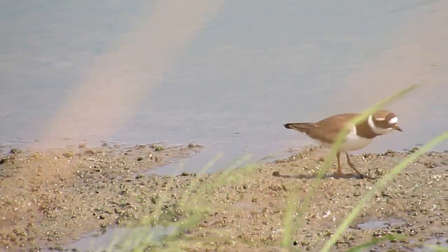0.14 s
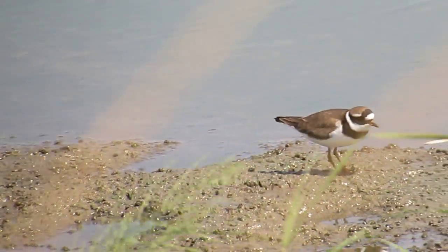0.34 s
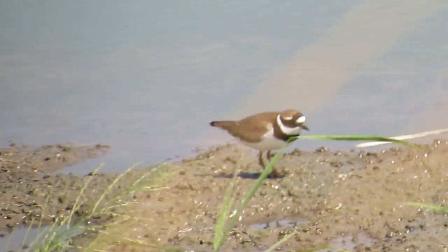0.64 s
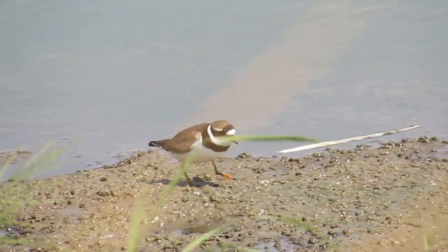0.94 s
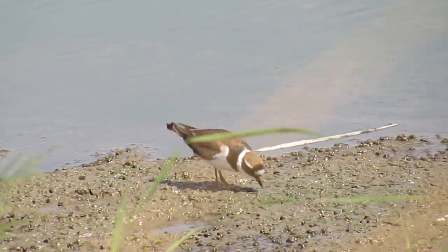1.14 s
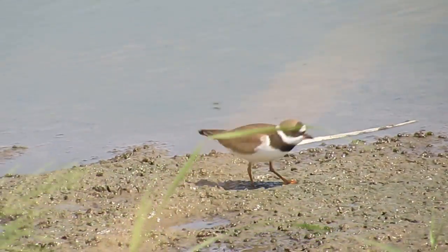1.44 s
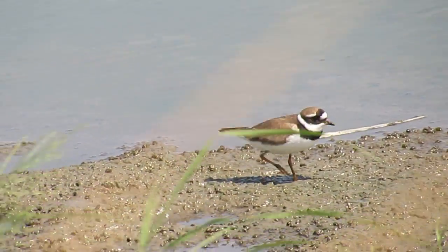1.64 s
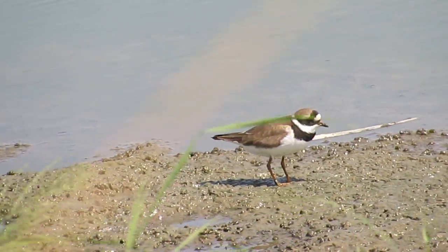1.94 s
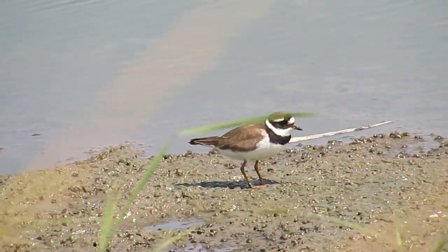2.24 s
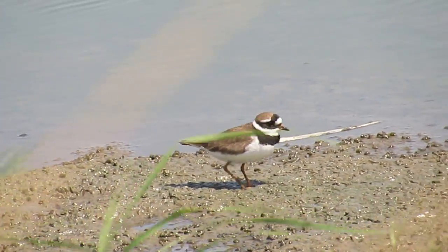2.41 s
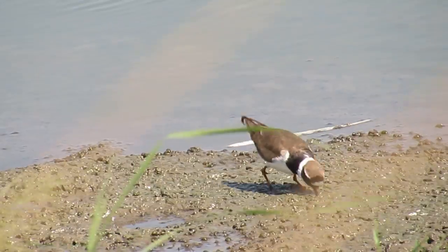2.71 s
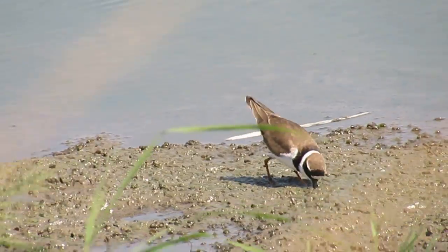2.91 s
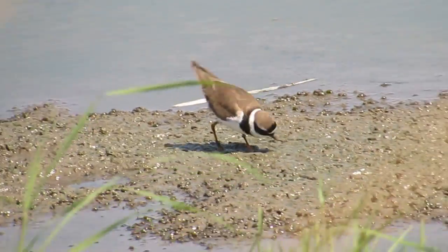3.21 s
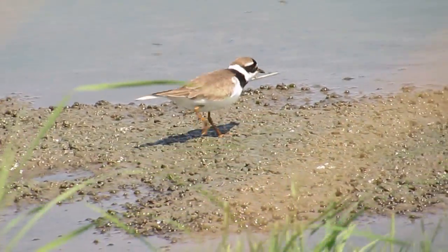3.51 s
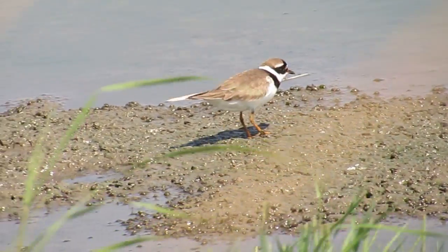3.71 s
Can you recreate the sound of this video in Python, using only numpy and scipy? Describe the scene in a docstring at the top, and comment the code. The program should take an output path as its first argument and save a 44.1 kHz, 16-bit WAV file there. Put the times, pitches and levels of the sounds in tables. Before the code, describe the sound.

Gusty wind rumble and overloaded thuds on an open shore, a faint bird whistle near one second.

```python
"""A steady distant rush and hiss on an open muddy shore, buffeted by low wind, with one thin bird whistle.
Filtered noise makes the rush and hiss, wandering sines a faint hum, and a gliding sine the wading bird.
Wind is low noise and runs of pressure pulses, mostly opposite in sense at two close microphone ports.
The two strongest bouts of gusts overload the recorder and drive its gain control down; the background
swells back after each. One tiny high tick is a decaying burst of noise."""
import sys
import numpy as np
from scipy import signal
from scipy.fft import rfft, irfft
from scipy.io import wavfile
from scipy.ndimage import uniform_filter1d, minimum_filter1d

SR = 44100
rng = np.random.default_rng(int(sys.argv[2]) if len(sys.argv) > 2 else 0)


def put_to_file(sound):
    """Save the sound as 16-bit audio at rate SR, in the file named by the first command-line argument."""
    columns = np.atleast_2d(sound).T  # one column per channel
    safe = np.clip(columns, -1, 1)
    whole_steps = np.round(safe * 32767)
    wavfile.write(sys.argv[1], SR, whole_steps.astype(np.int16))


N = 170226
T = np.arange(N) / SR
HZ = np.arange(N // 2 + 1) * SR / N
OPPOSITE = np.array([[1], [-1]])   # left and right in opposite senses


def from_db(db):
    """Decibels are logarithmic: 20 dB is a factor of ten in amplitude."""
    return 10 ** (np.asarray(db) / 20)


def rms_one(x):
    """Normalisation: divide by the root mean square, so that a level in dB can be set afterwards."""
    return x / np.sqrt(np.mean(x ** 2) + 1e-20)


def in_time(rows):
    """Linear interpolation: each column of a time curve, at every sample."""
    seconds, *columns = np.transpose(rows)
    return [np.interp(T, seconds, column) for column in columns]


def over_hz(points):
    """Interpolation on a logarithmic frequency axis: a (Hz, dB) curve at every frequency."""
    hz, db = np.transpose(points)
    return np.interp(np.log(HZ + 1e-9), np.log(hz), db)


def white():
    """White noise has equal expected power at all frequencies; this is its spectrum, freshly drawn."""
    return rfft(rng.standard_normal(N))


def coloured(noise, points):
    """Spectral shaping: a noise spectrum weighted by (Hz, dB) points, as a signal of unit rms."""
    return rms_one(irfft(noise * from_db(over_hz(points)), N))


def drift(rate_hz):
    """Low-passed noise fluctuates slowly at random; scaled to unit rms."""
    return rms_one(irfft(white() / (1 + (HZ / rate_hz) ** 2), N))


# Spectra of the air sound, common to both sides and opposite between them.
# Each row: frequency in Hz, relative spectral level in dB.
COMMON_SPECTRUM = [(10, -17), (20, 4), (31, -9.5), (62, -2.5), (130, -7.5), (350, -11.5), (490, -18),
                   (650, -18), (950, -22), (1350, -21.5), (1620, -24.5), (1780, -30), (2700, -33.5),
                   (3500, -36.5), (4500, -39.5), (6500, -43), (8600, -42.5), (9500, -48), (13000, -52.5),
                   (14500, -63)]
OPPOSED_SPECTRUM = [(10, -7), (40, -6), (100, -13), (250, -13.5), (720, -16), (1200, -25), (2700, -31.5),
                    (4500, -38.5), (7000, -38.5), (9500, -40), (13000, -45), (14500, -58)]
# Slow swell of the air sound. Each row: time in seconds, gain in dB.
AIR_SWELL = [(0, 1.5), (.6, 0.34), (1.15, -0.8), (1.6, -0.35), (2.1, -0.5), (2.7, 0.5), (3.05, -0.26),
             (3.5, 0.7), (3.85, -0.2)]
COMMON_DB, OPPOSED_DB = -32, -38.5        # rms before swell and waver
QUADRATURE_SHARE = 0.2                    # quarter-cycle share of the common noise, as amplitude
RUSH_TOP_HZ = 1730                        # the rush lies below, the hiss above
RUSH_WAVER_DB, HISS_WAVER_DB = 0.38, 0.64   # rms


def background():
    """Partly coherent noise: rush and hiss swell and waver, and the phase lag at left places them rightward."""
    common_noise = white()
    independent_part = np.sqrt(1 - QUADRATURE_SHARE ** 2) * white()
    lagging_part = -1j * QUADRATURE_SHARE * common_noise   # -1j turns the phase back a quarter cycle
    mid = from_db(COMMON_DB) * coloured(common_noise, COMMON_SPECTRUM)
    side = from_db(OPPOSED_DB) * coloured(independent_part + lagging_part, OPPOSED_SPECTRUM)
    swell_db, = in_time(AIR_SWELL)
    air = np.array([mid + side, mid - side]) * from_db(swell_db)
    rush = irfft(rfft(air) / (1 + (HZ / RUSH_TOP_HZ) ** 12), N)
    hiss = air - rush
    return rush * from_db(RUSH_WAVER_DB * drift(10)) + hiss * from_db(HISS_WAVER_DB * drift(42))


# Faint tones. Each row: mean frequency in Hz, level in dB rms about which it wanders.
HUM = [(43.5, -38), (206, -44), (408, -48), (1017, -59.5), (1244, -57.5)]
HUM_WANDER_HZ, HUM_WANDER_DB = 1.66, 2   # rms


def hum():
    """Frequency and amplitude modulation: slow chance moves the pitch and level of each sine."""
    total = np.zeros(N)
    for hz, db in HUM:
        level = from_db(db + HUM_WANDER_DB * drift(9))
        phase = 2 * np.pi * np.cumsum(hz + HUM_WANDER_HZ * drift(5.5)) / SR
        total += level * np.sqrt(2) * np.sin(phase)
    return total


# Lean of the background and hum. Each row: frequency in Hz, left minus right in dB.
BALANCE = [(70, 5), (180, 0.5), (420, 2), (900, -1), (2300, -0.7), (6000, 0)]


def leaning(x):
    """Interaural level difference: half the lean is added at left and half taken from the right."""
    return irfft(rfft(x) * from_db(over_hz(BALANCE) / 2 * OPPOSITE), N)


# A tiny high tick. Each row: start in seconds, level at onset in dB rms.
TICKS = [(0.3618, -40)]
TICK_HZ, TICK_HALF_WIDTH_HZ, TICK_DECAY_S = 12700, 1200, .0007   # decay is the time constant


def ticks():
    """Exponential decay: band-limited high noise starts at once and dies away within milliseconds."""
    bursts = np.zeros(N)
    for start, db in TICKS:
        bursts += from_db(db) * (T >= start) * np.exp(-np.abs(T - start) / TICK_DECAY_S)
    band = 1 / (1 + ((HZ - TICK_HZ) / TICK_HALF_WIDTH_HZ) ** 2)
    return bursts * rms_one(irfft(white() * band, N))


# The bird's whistle, level and then arched. Each row: time in seconds, frequency in Hz,
# level in dB rms before waver.
WHISTLE = [(.845, 2600, -60), (.856, 2655, -47), (.884, 2604, -47.5), (.986, 2612, -48), (1.02, 2640, -49),
           (1.036, 2980, -39), (1.049, 3130, -62), (1.061, 3000, -41.5), (1.076, 2550, -55)]
WHISTLE_WAVER_DB, WHISTLE_WAVER_HZ = .6, 6   # rms
SCATTER_DB, SCATTER_S = -16, .22   # scatter energy relative to the call, and time to fall 60 dB


def bird():
    """A nearly pure tone and its diffuse scatter from the shore, by convolution with decaying noise."""
    hz, db = in_time(WHISTLE)
    within = (T > WHISTLE[0][0]) & (T < WHISTLE[-1][0])
    sounding = uniform_filter1d(within * 1., size=200)   # softened ends
    level = from_db(db + WHISTLE_WAVER_DB * drift(40))
    phase = 2 * np.pi * np.cumsum(hz + WHISTLE_WAVER_HZ * drift(58)) / SR
    call = sounding * level * np.sqrt(2) * np.sin(phase)
    scatter = rng.standard_normal((2, SR // 2)) * from_db(-60 * T[:SR // 2] / SCATTER_S)
    scatter /= np.sqrt(np.sum(scatter ** 2, axis=1, keepdims=True))   # unit energy on each side
    return call + from_db(SCATTER_DB) * signal.fftconvolve(call[None], scatter)[:, :N]


BREEZE_BOTTOM_HZ, BREEZE_TOP_HZ = 33, 88.5


def turbulence():
    """Turbulent pressure as band-limited noise: low rumbling swings of unit rms."""
    low_cut = (HZ / BREEZE_BOTTOM_HZ) ** 2 / np.sqrt(1 + (HZ / BREEZE_BOTTOM_HZ) ** 4)
    high_cut = 1 / np.sqrt(1 + (HZ / BREEZE_TOP_HZ) ** 8)
    return rms_one(irfft(white() * low_cut * high_cut, N))


EDDIES_PER_CYCLE = 1.1       # before rounding to an odd count
EDDY_SPREAD_OCTAVES = 0.57   # either way from the centre
GUST_EDGE_DB = -9.5          # first and last eddy, relative to the middle one


def gust(middle_s, length_s, centre_hz):
    """Superposed eddies: each a rounded push with a rebound on both sides, strongest mid-gust; peak 1."""
    near = np.abs(T - middle_s) < length_s + .04
    count = 2 * max(1, round(length_s * centre_hz * EDDIES_PER_CYCLE / 2)) + 1
    slots = np.linspace(-1, 1, count)
    jitter, shuffle, sense = rng.uniform(-1, 1, (3, 32))[:, :count]
    times = middle_s + length_s / 2 * (slots + jitter / count)
    hz = centre_hz * 2 ** (EDDY_SPREAD_OCTAVES * slots[np.argsort(shuffle)])
    heights = np.sign(sense) * from_db(GUST_EDGE_DB * np.abs(slots))
    u = (np.pi * hz[:, None] * (T[near] - times[:, None])) ** 2
    pulses = (1 - 2 * u) * np.exp(-u)
    pressure = np.zeros(N)
    pressure[near] = heights @ pulses
    return pressure / np.abs(pressure).max()


# Breeze on the ports. Each row: time in seconds, opposed level in dB rms before its lumpiness.
BREEZE = [(0, -17.5), (.33, -26), (.46, -45), (.92, -45), (1.0, -19), (1.1, -23), (1.3, -14), (1.5, -28),
          (1.86, -25.5), (1.93, -43), (2.04, -19.5), (2.16, -33), (2.3, -21), (2.55, -24), (2.85, -32),
          (3.05, -45), (3.52, -43), (3.6, -29), (3.85, -34)]
# Gusts. Each row: middle in seconds, peak of the opposed part in dB, length in seconds,
# centre frequency of the eddies in Hz, peak of the common part relative to the opposed in dB.
GUSTS = [(0.165, -3, 0.073, 88, -11.5), (0.372, -8, 0.036, 55, -19), (1.04, -1, 0.031, 98, -13.5),
         (1.064, -9.5, 0.015, 109, -12), (1.134, -8, 0.031, 48, -9.5), (1.164, 3, 0.0097, 137, -22),
         (1.18, 11.5, .018, 119, -13), (1.197, 7.5, 0.019, 163, -14), (1.219, 8, 0.0183, 194, -12.5),
         (1.425, -11.5, .05, 93, -16), (1.618, -11, 0.033, 77, -17), (1.707, -4, 0.048, 79.5, -12.5),
         (2.001, -12.5, 0.037, 74, -16), (2.338, -8, 0.037, 49.4, -14.5), (2.371, 2.5, 0.014, 84, -14.5),
         (2.386, 7, .014, 105, -11), (2.43, 0, .035, 77.65, -12.5), (2.459, 5, 0.0098, 113, -13),
         (2.52, -7.5, .02, 96, -19), (2.623, -8.5, 0.019, 66, -17), (2.761, -11.5, 0.027, 65.8, -12),
         (2.866, -18, 0.021, 70, -21.5), (3.703, -14, 0.022, 45, -17), (3.839, -19, 0.031, 35.8, -10)]
BREEZE_LUMPINESS_DB, BREEZE_COMMON_DB = 2.8, -20   # rms; common part relative to the opposed


def wind():
    """Pressure differences: breeze and gusts push the ports in opposite senses, with a weaker common part."""
    breeze_db, = in_time(BREEZE)
    breeze = from_db(breeze_db + BREEZE_LUMPINESS_DB * drift(15))
    opposed = breeze * turbulence()
    common = from_db(BREEZE_COMMON_DB) * breeze * turbulence()
    for middle_s, db, length_s, hz, common_db in GUSTS:
        opposed = opposed + from_db(db) * gust(middle_s, length_s, hz)
        common = common + from_db(db + common_db) * gust(middle_s, length_s, hz)
    return opposed * OPPOSITE + common


def scene():
    """Linear superposition: the sounds and wind pressures add at the two ports."""
    return leaning(background() + hum()) + ticks() + bird() + wind()


LIMIT_DB, START_CUT_DB = .7, 10.5   # peak limit re full scale; least cut at the start
HOLD_S, RELEASE_S, ATTACK_S = 0.12, 0.53, 0.0055   # release is the time constant of the cut in dB


def gain_control(x):
    """Peak limiting: the gain falls just ahead of peaks over the limit, holds briefly, then creeps back."""
    peak_db = 20 * np.log10(np.abs(x).max(axis=0) + 1e-9)   # the louder side governs both
    over = np.maximum(peak_db - LIMIT_DB, 0)
    hold = 2 * int(HOLD_S * SR / 2) + 1
    over = -minimum_filter1d(-over, hold, origin=hold // 2)   # largest excess in the time just past
    over[0] = max(over[0], START_CUT_DB)
    fade = np.exp(-T / RELEASE_S)
    cut = np.maximum.accumulate(over / fade) * fade
    attack = int(ATTACK_S * SR) + 1
    gain_db = uniform_filter1d(minimum_filter1d(-cut, attack), attack)
    return x * from_db(gain_db)


# Narrow dips of the recorder. Each row: centre in Hz, width in Hz.
NOTCHES = [(3960, 300), (7900, 68)]
OVERLOAD_ORDER = 10   # higher flattens more sharply at full scale
CUTOFF_HZ = 15000


def record(dry):
    """Filtering and saturation: gain control, narrow dips, flattening at full scale, and a top cut."""
    x = gain_control(dry)
    for hz, width_hz in NOTCHES:
        b, a = signal.iirnotch(hz, hz / width_hz, fs=SR)
        x = signal.lfilter(b, a, x)
    x = x / (1 + np.abs(x) ** OVERLOAD_ORDER) ** (1 / OVERLOAD_ORDER)
    top_cut = signal.ellip(10, .1, 80, CUTOFF_HZ, fs=SR, output="sos")
    return signal.sosfilt(top_cut, x)


dry = scene()
out = record(dry)
put_to_file(out)
```